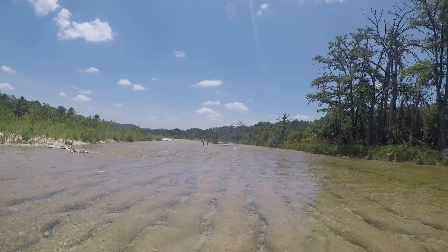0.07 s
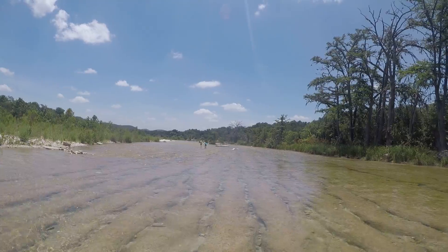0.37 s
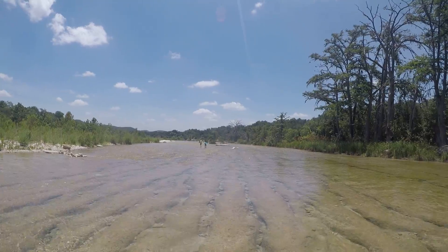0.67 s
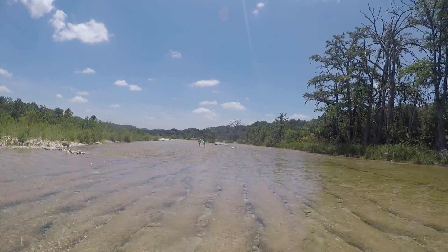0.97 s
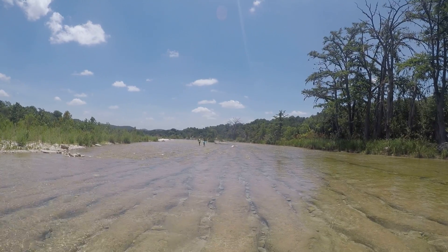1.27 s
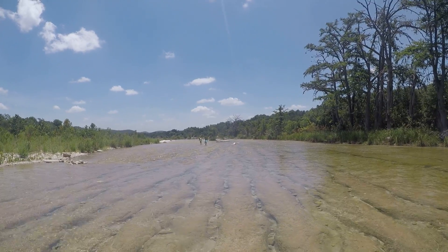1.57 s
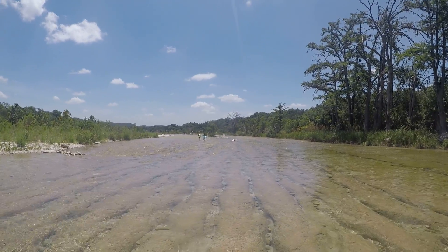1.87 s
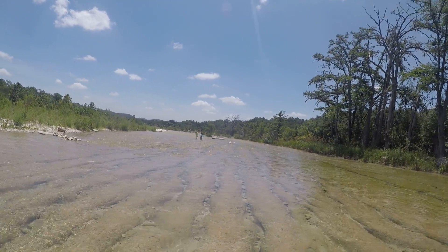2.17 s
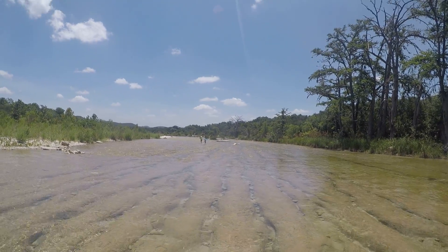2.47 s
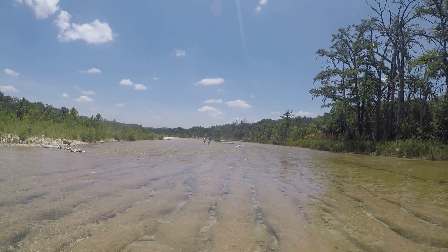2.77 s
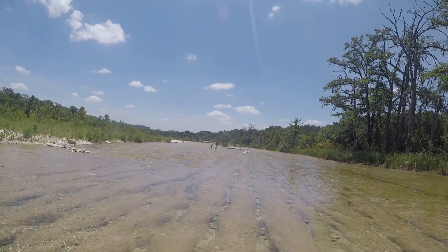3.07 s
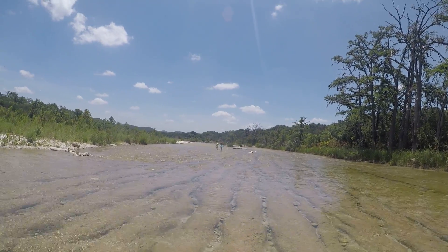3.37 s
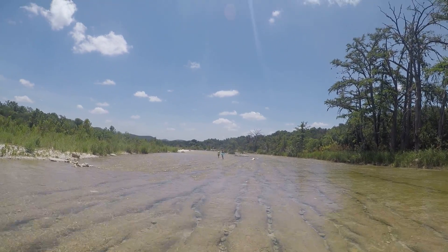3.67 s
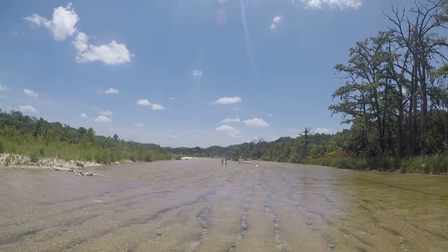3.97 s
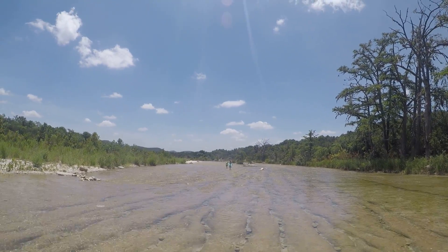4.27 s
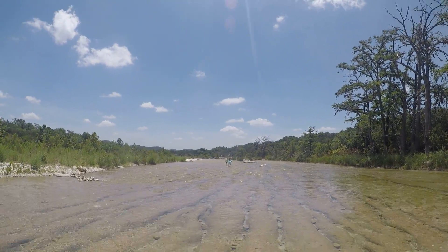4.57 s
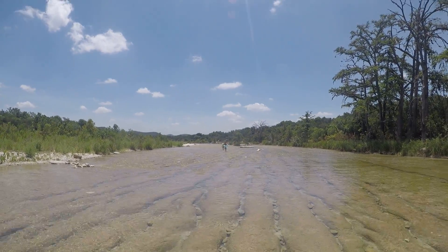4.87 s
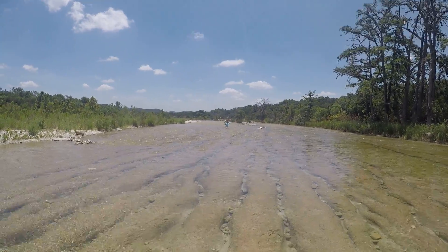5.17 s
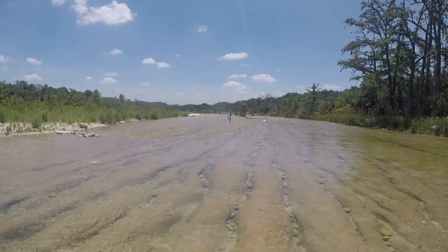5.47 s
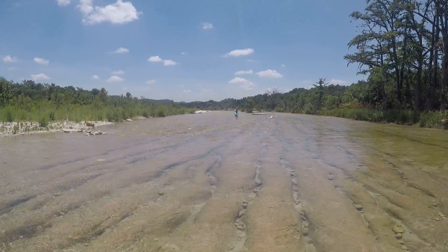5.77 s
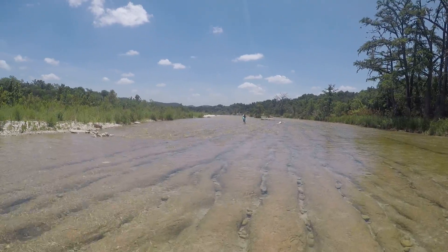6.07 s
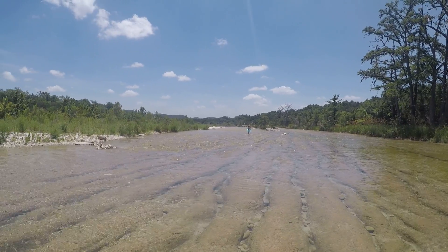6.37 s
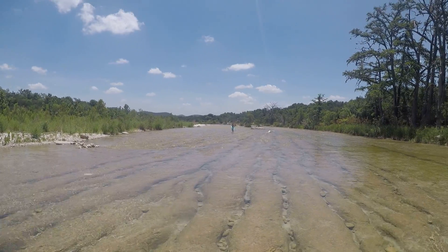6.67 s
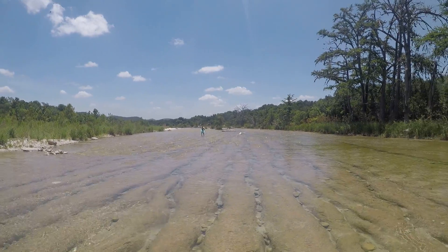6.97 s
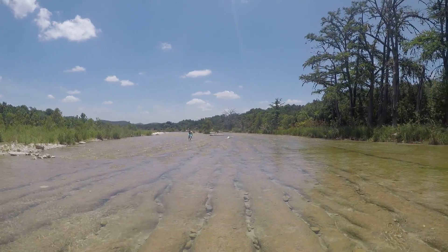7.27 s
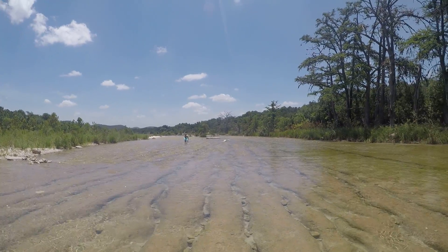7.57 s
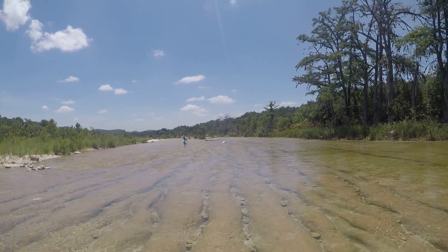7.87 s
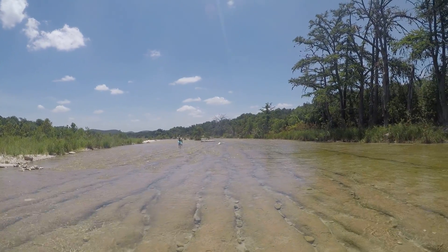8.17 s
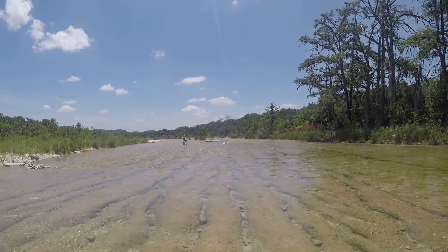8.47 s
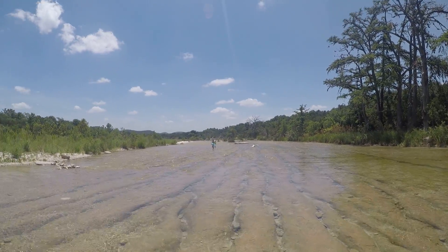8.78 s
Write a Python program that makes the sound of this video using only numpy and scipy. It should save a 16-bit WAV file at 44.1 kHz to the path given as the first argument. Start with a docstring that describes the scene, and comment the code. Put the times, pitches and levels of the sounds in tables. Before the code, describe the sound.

Someone wades through a shallow river, heard from a microphone inside a handheld plastic case. Wind rumbles throughout and a hand rubs dully, while the case knocks, scrapes and thumps on its mount. Underneath, legs push up soft, muffled sloshes with fizz and stray drips. The knocking is heaviest midway, then a distant bird whistles faintly once. A quieter stretch of water and wind ends with two hard knocks.

```python
"""Someone wades up a shallow river carrying a small camera in a waterproof case. From the start, wind
rumbles and a hand rubs while the case knocks and scrapes on its mount, which thumps and rings. Each leg
pushes up a slosh, muffled by the plastic, with fizz and stray drips. A limiter ducks the hard knocks,
heaviest near 4.4 s. The image then closes to mono and a far bird calls once at 5.4 s. From 7 s the
image reopens over quiet water and wind, and two hard knocks end the scene."""
import sys
import numpy as np
from scipy import signal
from scipy.fft import rfft, irfft, next_fast_len
from scipy.io import wavfile
from scipy.ndimage import uniform_filter1d, minimum_filter1d

SR = 44100
rng = np.random.default_rng(int(sys.argv[2]) if len(sys.argv) > 2 else 0)


def bounce(signal):
    """Save signal as a 16-bit WAV file at the path given by the first command-line argument."""
    frames = np.transpose(np.atleast_2d(signal))
    limited = np.clip(frames, -1, 1)
    pcm = np.round(limited * 32767).astype(np.int16)
    wavfile.write(sys.argv[1], SR, pcm)


N = 388962
TIME = np.arange(N) / SR

# a leg pushes the water aside: crest_s, half_length_s, slosh_db, gurgle_db, fizz_db
SURGES = [(.55, 0.16, -66, -58.5, -75), (1.0, 0.056, -71, -54, -82), (1.42, 0.13, -47, -56.5, -57),
          (1.74, 0.1, -47.5, -60, -56.5), (1.9, 0.092, -43, -68, -67), (3.2, 0.25, -58, -57, -64),
          (3.55, 0.12, -61, -53, -50.5), (4.04, 0.032, -42, -70, -45.5), (4.23, 0.049, -47, -64, -50),
          (4.33, 0.052, -49, -64, -57), (4.77, 0.033, -42, -49, -67), (4.9, 0.048, -39, -56, -45),
          (5.02, 0.091, -43.5, -61, -47), (5.21, .11, -51.5, -70, -56), (5.8, .17, -49.5, -64, -58),
          (6.5, 1, -59.5, -78, -68)]
# the river running on between surges: time_s, slosh_db, spray_db
CURRENT = [(0, -55, -63), (2.4, -55.5, -62.5), (3.5, -55.5, -61.5), (4.4, -51.5, -63.5), (5.3, -57, -65.5),
           (6.3, -56, -63), (7.4, -59, -65), (8.8, -56, -63)]
# borders of the case's four tonal bands: edge_hz
BAND_EDGES_HZ = [200, 590, 1750, 3700, 12000]


def amp(db):
    """Decibels to gain."""
    return 10 ** (np.asarray(db) / 20)


def unit(x):
    """Scales to rms 1."""
    return x / np.sqrt(np.mean(x ** 2) + 1e-20)


def curve(rows, axis=1):
    """One column of a time table as a sample-by-sample automation curve."""
    rows = np.asarray(rows)
    return np.interp(TIME, rows[:, 0], rows[:, axis])


def swells(rows, rest_db=-120, axis=2):
    """Bell-shaped gain swells over a floor; rows hold crest_s, half_length_s, then levels in dB."""
    power = sum(amp(row[axis]) ** 2 * np.exp(-2 * ((TIME - row[0]) / row[1]) ** 2) for row in rows)
    return np.sqrt(power + amp(rest_db) ** 2)


def wander(per_s):
    """Random drift of rms 1 that turns about per_s times a second."""
    return unit(np.interp(TIME * per_s, np.arange(8000), rng.standard_normal(8000)))


def colour(x, points, turn=1):
    """EQ through (freq_hz, gain_db) points; turn=1j also shifts the phase a quarter cycle."""
    size = next_fast_len(len(x) + 2048)
    hz, db = np.transpose(points)
    gain = amp(np.interp(np.log(np.fft.rfftfreq(size, 1 / SR) + 1), np.log(hz), db))
    return irfft(rfft(x, size) * gain * turn, size)[:len(x)]


def band_rms(x, low_hz, high_hz):
    """Rms of x between two frequencies."""
    size = next_fast_len(len(x))
    hz = np.fft.rfftfreq(size, 1 / SR)
    band = rfft(x, size)[(hz > low_hz) & (hz < high_hz)]
    return np.sqrt(2 * np.sum(abs(band) ** 2)) / len(x)


def add(mix, start_s, sound):
    """Lays a sound into the mix, trimming any overhang."""
    start = round(start_s * SR)
    sound = sound[..., max(-start, 0):]
    part = mix[..., max(start, 0):][..., :sound.shape[-1]]
    part += sound[..., :part.shape[-1]]


def ring(t, hz, t60, swell_cycles=0.23):
    """A mode that builds within its first cycle from t = 0 and dies away."""
    t = np.maximum(t, 0)
    attack = 1 - np.exp(-(t * hz / swell_cycles) ** 2)
    return np.sin(2 * np.pi * hz * t) * np.exp(-np.log(1000) * t / t60) * attack


def diffuse(source, spectrum):
    """Mid and side of a sound arriving from all round: two independent layers of one source."""
    # side against mid for airborne sound: freq_hz, gain_db
    air_side = [(30, -28), (110, -7), (200, -3.5), (370, 3.5), (690, 11), (1270, 8.5), (2340, 3.5),
                (4300, -0.5), (8000, 1.5), (14600, -1.5)]
    mid = colour(source(), spectrum)
    side = colour(colour(source(), spectrum), air_side)
    return np.array([mid, side])


def bird():
    """A far bird's single thin, arched whistle."""
    # the call's contour: time_s, pitch_hz, level_db
    call = [(5.365, 3070, -64), (5.395, 3380, -61), (5.42, 3690, -64), (5.44, 3800, -58), (5.46, 3600, -69)]
    gate = uniform_filter1d(1. * ((TIME > call[0][0]) & (TIME < call[-1][0])), size=300)
    phase = 2 * np.pi * np.cumsum(curve(call)) / SR
    return gate * amp(curve(call, axis=2)) * np.sin(phase)


def wind(lump_db=1.0, trim_db=1.5):
    """Air buffets the case: a lumpy low rumble with a few gusts."""
    # the breeze bed: time_s, level_db
    breeze = [(0, -30), (1.3, -34.5), (1.7, -29), (2.3, -31.5), (2.7, -23.5), (3.3, -24.5), (4.0, -30),
              (4.9, -24.5), (5.3, -32.5), (5.95, -27.5), (6.2, -39), (6.45, -29), (7.0, -33), (7.5, -30),
              (8.3, -35), (8.8, -28)]
    # gusts on top: crest_s, half_length_s, level_db
    gusts = [(1.5, 0.033, -19), (1.98, 0.077, -14), (2.83, 0.054, -19.5), (3.19, 0.047, -19),
             (3.8, 0.068, -21), (4.52, 0.032, -10.5), (4.65, 0.095, -17.5), (4.95, 0.022, -19),
             (5.92, .03, -24)]
    # rumble EQ: freq_hz, gain_db
    rumble_eq = [(8, -6.5), (20, 1), (30, 3.5), (45, -1.5), (70, -9.5), (110, -22.5), (200, -30.5),
                 (500, -82.5)]
    air = diffuse(lambda: rng.standard_normal(N) * amp(lump_db * wander(12)), rumble_eq)
    return air / band_rms(air[0], 10.5, 58) * amp(trim_db) * swells(gusts, curve(breeze))


def grip(jerk_db=4.5, edge_s=0.0091, rest_db=-48):
    """Skin creeps on the handle in small dull jerks, harder while the hand shifts."""
    # the hand shifts its hold: start_s, length_s, level_db
    shifts = [(0, 0.25, -38), (0.765, 0.53, -42.5), (1.44, 0.78, -35.5), (2.386, 0.15, -39.5),
              (3.108, 0.38, -37.5), (3.545, 0.46, -36.5), (4.2, 0.75, -37), (4.856, .24, -31),
              (5.11, .9, -40), (6.3, 0.52, -46), (8.452, 0.18, -40.5)]
    # dull rub EQ: freq_hz, gain_db
    rub_eq = [(30, -6), (70, 4.5), (115, 8), (160, -3.5), (250, -12), (380, -12), (470, -24), (800, -35.5),
              (1500, -67)]
    jerks = amp(jerk_db * wander(55))
    rub = diffuse(lambda: rng.standard_normal(N) * jerks, rub_eq)
    shifting = np.zeros(N)
    for start_s, length_s, level_db in shifts:
        corners_s = start_s + np.array([-edge_s, edge_s, length_s - edge_s, length_s + edge_s])
        shifting += amp(level_db) * np.interp(TIME, corners_s, [0, 1, 1, 0])
    return rub / band_rms(rub[0], 124, 600) * np.hypot(shifting, amp(rest_db))


def drips(t60=0.035, rise_per_s=0.89):
    """Single drops fall back, each leaving a bubble that rings slightly upward."""
    # the drops: start_s, level_db, pitch_hz
    drops = [(2.347, -40, 2940), (3.111, -36.5, 1620), (3.163, -36, 1480), (6.648, -42.5, 3220),
             (7.464, -38, 1550), (8.642, -48, 3460)]
    out, t = np.zeros(N), np.arange(3000) / SR
    for start_s, level_db, pitch_hz in drops:
        add(out, start_s, amp(level_db) * ring(t, pitch_hz * (1 + rise_per_s * t), t60))
    return out


def bubbles(per_s=900, scatter_db=1.0, cycles=22, glide=0.035, wash=3.2, sizes=30):
    """Bubbles of many sizes ring and rise in pitch within a wash of churned water."""
    out = np.zeros(N)
    for hz in np.geomspace(600, 6500, sizes):
        age = np.linspace(0, 1, int(cycles * SR / hz))
        pop = np.sin(2 * np.pi * cycles * age * (1 + glide * age)) * np.exp(-5 * age) * np.sqrt(hz)
        births = rng.random(N) < per_s / sizes / SR
        strength = amp(scatter_db * np.minimum(rng.exponential(1, N), 5))
        out += signal.oaconvolve(births * strength, pop)[:N]
    return unit(out) + wash * rng.standard_normal(N)


def swishes():
    """Fine bubbles fizz as each leg sweeps forward."""
    # bright fizz EQ: freq_hz, gain_db
    fizz_eq = [(1200, -7.5), (2300, -12), (2750, -3), (3100, 3.5), (3400, -5), (3750, -12.5), (5000, -15),
               (6200, -8.5), (7800, -8), (12000, -44)]
    fizz = diffuse(lambda: bubbles(per_s=800, scatter_db=3.4, cycles=14, wash=.35), fizz_eq)
    return fizz / fizz[0].std() * swells(SURGES, axis=4)


def gurgle(centre_hz=1515, width_hz=180, side_db=-5, throb_db=1.0, current_trim_db=-8):
    """Churning water drives one narrow air resonance of the case."""
    b, a = signal.iirpeak(centre_hz, centre_hz / width_hz, fs=SR)
    hollow = signal.lfilter(b, a, signal.lfilter(b, a, rng.standard_normal((2, N))))
    churn = swells(SURGES, curve(CURRENT) + current_trim_db, axis=3)
    return unit(hollow) * amp([[0], [side_db]]) * churn * amp(throb_db * wander(14))


def water(slosh_trim_db=-2.0, lap_db=2.0, flicker_db=1.0):
    """Sloshing heard through the resonances of the case, with a smooth hiss of spray."""
    # slosh muffled by plastic: freq_hz, gain_db
    slosh_eq = [(150, 11), (400, 8), (750, -2.5), (1000, -1.5), (1150, -0.5), (1330, 2), (1580, -0.5),
                (1750, -6), (2150, -5.5), (2600, -11), (3080, -5.5), (3500, -18), (6000, -26), (12000, -46)]
    # airy spray EQ: freq_hz, gain_db
    spray_eq = [(1500, 2.5), (3500, 0.5), (5000, -3), (6200, -1), (7000, -0.5), (7800, -3.5), (9500, -1.5),
                (11000, -6.5), (13000, -12.5), (15000, -24)]
    laps = amp(lap_db * wander(28))
    slosh = diffuse(lambda: bubbles() * laps, slosh_eq)
    slosh *= amp(slosh_trim_db) * swells(SURGES, curve(CURRENT)) / band_rms(slosh[0], 760, 3500)
    spray = diffuse(lambda: rng.standard_normal(N), spray_eq)
    spray *= amp(curve(CURRENT, axis=2) + flicker_db * wander(40)) / band_rms(spray[0], 4300, 10800)
    return slosh + spray


def contact_db(hardness_hz, favoured_hz, db_per_octave=13, knee=3.05, boost_db=4, boost_octaves=0.86):
    """A blow's level per band: rolled off above its hardness frequency, lifted at its favoured pitch."""
    # how well each band of the case passes a blow: gain_db
    passed_db = [-2, -0.5, -2, 3]
    edges = np.array(BAND_EDGES_HZ)
    centres = np.sqrt(edges[1:] * edges[:-1])
    rolloff_db = db_per_octave * np.log2(1 + (centres / hardness_hz) ** knee) / knee
    lift_db = boost_db * np.exp(-(np.log2(centres / favoured_hz) / boost_octaves) ** 2)
    return passed_db + rolloff_db[0] - rolloff_db + lift_db


def case_ring(force, levels_db, favoured_hz, spot_db=4.0, detune=0.024, boost_db=9, boost_octaves=0.29):
    """The plastic case rings under a force; each spot of contact favours other modes."""
    # modes of the case: pitch_hz, level_db, t60_s
    case_modes = [(280, -1.5, 0.026), (384.2, 0, 0.055), (513.4, -4.5, 0.043), (631, -1, 0.018),
                  (688, -4.5, 0.038), (787, 1.5, 0.023), (992, 3, 0.015), (1174, 0.5, 0.03),
                  (1313, -1, 0.038), (1515, 0, 0.031), (1880, -9.5, 0.028), (2134, -5, 0.027),
                  (2600, -5, 0.013), (3020, 2.5, 0.018), (3310, -1.5, 0.02), (4240, -4.5, 0.0088),
                  (5280, -4.5, 0.0054), (6260, -3, 0.0092), (7530, -2.5, 0.0044), (8830, -5.5, 0.0053)]
    t = np.arange(3000) / SR
    hz, db, t60 = np.transpose(case_modes)[:, :, None]
    spot, shift = rng.standard_normal((2, len(case_modes), 1))
    log_edges = np.log(BAND_EDGES_HZ)
    # a soft blow leans to the lower modes
    tilt_db = np.interp(np.log(hz), (log_edges[1:] + log_edges[:-1]) / 2, levels_db)
    lift_db = boost_db * np.exp(-(np.log2(hz / favoured_hz) / boost_octaves) ** 2)
    modes = amp(db + tilt_db + lift_db + spot_db * spot) * ring(t, hz * (1 + detune * shift), t60)
    modes *= (-1) ** np.arange(len(case_modes))[:, None]  # neighbours move the wall in opposite senses
    out = np.zeros(len(force))
    for low, high, level_db in zip(BAND_EDGES_HZ, BAND_EDGES_HZ[1:], levels_db):
        response = (modes * (hz > low) * (hz <= high)).sum(0)
        band = signal.fftconvolve(force, response)[:len(force)]
        out += amp(level_db) * band / np.sqrt(np.sum(band ** 2) / (SR / 50))  # energy as rms over 20 ms
    return out


def knocks(grit=0.99, scrape_tail=0.91, spread=0.49, shove_db=-8, rock_db=-9):
    """Plastic scrapes up to a stop and hits it: the case rings briefly and the mount swings on."""
    # hits: time_s, scrape_s, thump_db, thump_hz, thump_t60_s, knock_db, hardness_hz, width_db
    hits = [(0.135, .001, -10.5, 80.5, 0.33, -49, 250, -4),
            (0.174, 0.0024, -15.5, 72.7, 0.19, -38.5, 385, -2),
            (0.224, 0.00088, -17.5, 73, 0.21, -33.5, 228, -1),
            (0.422, 0.0022, -7.5, 92, 0.16, -31.5, 126, -1), (0.458, 0.0011, -11.5, 98, 0.2, -38, 298, 2),
            (0.781, 0.0013, -12.5, 79, .1, -48, 230, -6.5), (0.855, .001, -11.5, 85.4, 0.13, -53, 250, -7),
            (0.939, 0.001, -11.5, 88.6, 0.17, -47, 220, -8), (1.065, 0.0011, -10, 98, .1, -43, 280, -1),
            (1.1, .0015, -13, 94, 0.13, -45, 250, -3), (1.127, 0.00088, -11, 89.2, 0.33, -46, 280, -3),
            (1.213, 0.00043, -10, 89, .11, -37.5, 404, -1), (1.309, 0.00064, -16.5, 67, 0.12, -35, 420, -1),
            (1.376, 0.0029, -0.5, 105, 0.051, -28.5, 2280, -0.5),
            (1.434, .023, -7, 76.4, .12, -42.5, 2600, -7),
            (1.476, 0.0021, -6, 115, 0.09, -24.5, 1940, -2.5),
            (1.524, 0.01, -10.5, 113.2, 0.48, -39, 840, 3.5), (1.916, 0.00068, 1, 113.4, 0.21, -11, 990, 2),
            (1.968, .001, -7.5, 130, .095, -31, 262, 4), (2.008, 0.0021, -3.5, 107.3, .12, -16.5, 327, 4),
            (2.116, 0.0013, -8.5, 112.3, 0.35, -14.5, 500, 2.5),
            (2.739, 0.00025, -6.5, 114, 0.43, -17, 325, 1.5),
            (2.955, 0.00053, -43.5, 77, .16, -46.5, 1400, 0),
            (3.218, 0.00086, -13.5, 67.5, 0.16, -44, 200, 5),
            (3.364, 0.0021, -18, 66.4, 0.3, -44.5, 250, -4), (3.583, 0.0014, -7, 65.3, 0.15, -28, 280, -3),
            (3.659, .0015, -8, 86, 0.054, -25.5, 320, -3), (3.712, 0.0014, -8.5, 88.6, 0.33, -20, 240, -3),
            (4.046, 0.004, -19, 112.7, 0.88, -35, 1800, -0.5),
            (4.106, 0.0014, -1, 113.6, 0.37, -18, 1310, -4.5), (4.42, 0.00093, 6, 99, 0.11, -2, 352, -2),
            (4.441, 0.0021, 9.5, 82.7, 0.22, -7, 880, 0), (4.613, 0.0023, -20, 85.5, .19, -31.5, 1100, 0),
            (4.69, 0.0089, -5.5, 82.8, .26, -25.5, 564, -2),
            (4.829, .0035, -36, 97.8, 0.11, -32.5, 1400, -1), (4.867, 0.0087, -7.5, 93, 0.3, -28, 1100, -1),
            (4.908, 0.0073, -16, 100, 0.085, -29.5, 1710, 0),
            (4.919, 0.0078, -6.5, 106, 0.1, -26.5, 2220, 1), (4.962, .009, -26, 118, .14, -32, 750, 0),
            (5.011, 0.0022, 0, 89.5, .12, -20.5, 950, -1.5), (5.039, 0.0025, 4.5, 77, 0.1, -10.5, 260, -2),
            (5.073, 0.0073, 1, 74.4, 0.11, -14, 463, 0), (5.211, 0.0026, -23, 133, 0.12, -38, 200, 0),
            (5.252, 0.0058, -6.5, 87, 0.036, -43.5, 1200, -5), (5.284, .002, -16, 82, 0.16, -41, 1310, 5),
            (5.363, 0.0022, -17.5, 84.6, 0.37, -38.5, 810, 11),
            (5.81, 0.0034, -9.5, 108.2, 0.18, -27.5, 1800, 2),
            (5.916, 0.0066, 0.5, 69, 0.051, -10.5, 487, 2), (5.922, 0.0022, 3, 102, 0.093, -10.5, 350, -2),
            (6.55, 0.0053, -10.5, 80, 0.053, -32.5, 1440, 0),
            (8.253, 0.0057, -27.5, 127, 0.083, -41, 180, 1), (8.545, 0.00091, -40, 72, 0.19, -39, 400, 3.5),
            (8.678, 0.0027, -19, 64, .05, -10.5, 280, 4.5),
            (8.683, 0.0004, 4.5, 101.6, 0.18, -3.5, 507, 4.5), (8.768, 0.0023, 8.5, 105, .08, -7, 594, 0.5)]
    # the pitch each knock rings at most strongly: time_s, pitch_hz
    knock_pitch = [(1.2, 353), (1.48, 365), (1.9, 1110), (2.0, 400), (2.12, 764), (2.74, 400), (3.7, 412),
                   (4.1, 1120), (4.41, 405), (4.45, 1140), (4.7, 473), (5.05, 501), (5.92, 558),
                   (6.55, 1000), (8.25, 368), (8.68, 480), (8.77, 860)]
    # side against mid for sound carried by the case: freq_hz, gain_db
    case_side = [(50, -19), (110, -17), (180, -1.5), (380, 1), (750, 9), (1300, 3.5), (2100, 5.5),
                 (3000, -4.5), (6000, 0.5), (12000, -13)]
    out = np.zeros((2, N))
    t = np.arange(-2048, 18000) / SR  # the hit lands at t = 0
    contact_t = t[:6144]
    padding = (0, len(t) - len(contact_t))
    for time_s, scrape_s, thump_db, thump_hz, thump_t60_s, knock_db, hardness_hz, width_db in hits:
        slips = rng.standard_normal(len(contact_t)) * rng.exponential(1, len(contact_t))
        slips *= np.exp(-abs(contact_t) / (scrape_s * np.where(contact_t < 0, 1, scrape_tail)))
        scrape = grit * scrape_s / 0.0024 * slips / np.linalg.norm(slips)
        force = (contact_t == 0) + scrape  # long contacts are mostly scrape
        favoured_hz = np.interp(time_s, *np.transpose(knock_pitch))
        levels_db = knock_db + contact_db(hardness_hz, favoured_hz)
        front = np.pad(case_ring(force, levels_db, favoured_hz), padding)
        flank = np.pad(case_ring(force, levels_db, favoured_hz), padding)
        swing = ring(t, thump_hz, thump_t60_s) + amp(shove_db) * ring(t, hz=147, t60=0.027)
        mid = front - amp(thump_db) * swing
        # the blow reaches the left port first, so the side runs a quarter cycle ahead
        side = amp(width_db) * colour(mid + spread * flank, case_side, turn=1j)
        side += amp(thump_db + width_db + rock_db) * ring(t, hz=146, t60=0.086)  # mount rocks sideways
        add(out, time_s + t[0], np.array([mid, side]))
    return out


def scene():
    """Mixes all layers as mid and side, rides the width, and returns left and right."""
    # stereo width, 0 for mono: time_s, side_gain
    width = [(4.5, 0.99), (5.0, 0.2), (5.4, 0), (7.0, 0), (7.5, 0.55), (8.1, 0.74)]
    mid, side = knocks() + wind() + grip() + water() + swishes() + gurgle()
    mid = mid + drips() + bird()
    side = side * curve(width)
    return np.array([mid + side, mid - side])


def ducking(over_db, release_db_per_s):
    """Gain reduction in dB that jumps to each peak and releases steadily."""
    release_db = TIME * release_db_per_s
    return np.maximum.accumulate(over_db + release_db) - release_db


def record(dry, ceiling_db=-1.2, quick_db_per_s=130, slow_db_per_s=7, slow_share=0.25, top_hz=14700):
    """Adds a faint whine, then a look-ahead limiter with a quick-then-slow release, then a low-pass."""
    # electronic whine: pitch_hz, rms_db
    whine = [(4000, -86), (7000, -81)]
    mix = dry + sum(amp(db) * np.sqrt(2) * np.sin(2 * np.pi * hz * TIME) for hz, db in whine)
    over_db = np.maximum(20 * np.log10(abs(mix).max(0) + 1e-9) - ceiling_db, 0)
    duck_db = np.maximum(ducking(over_db, quick_db_per_s), ducking(slow_share * over_db, slow_db_per_s))
    gain_db = uniform_filter1d(minimum_filter1d(-duck_db, size=41), size=41)  # eases in before the peak
    lowpass = signal.firwin(511, top_hz, window=("kaiser", 9), fs=SR)
    return signal.oaconvolve(mix * amp(gain_db), lowpass[None], "same")


dry = scene()
out = record(dry)
bounce(out)
```